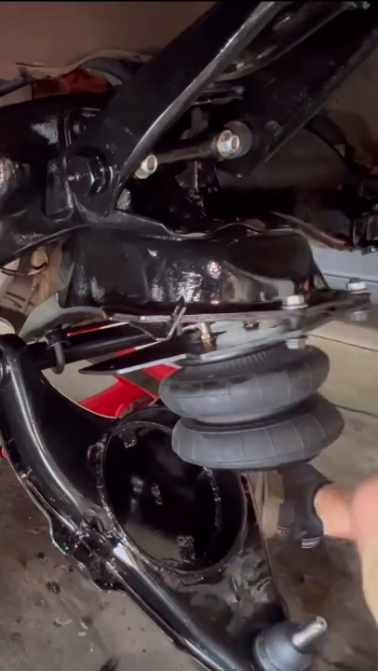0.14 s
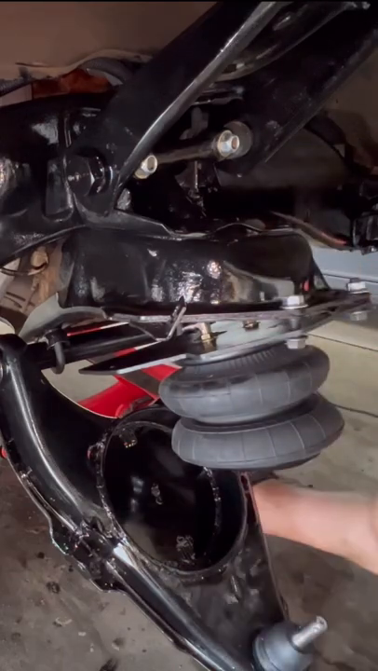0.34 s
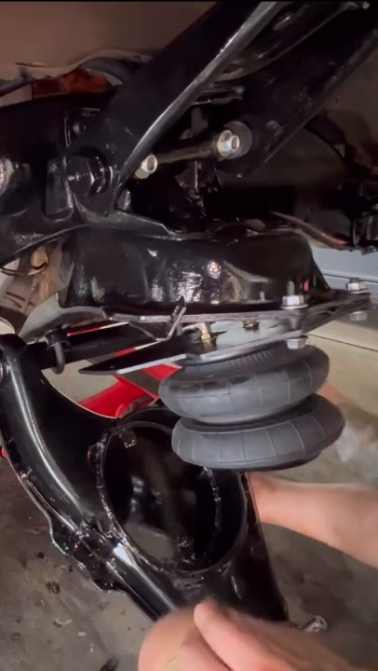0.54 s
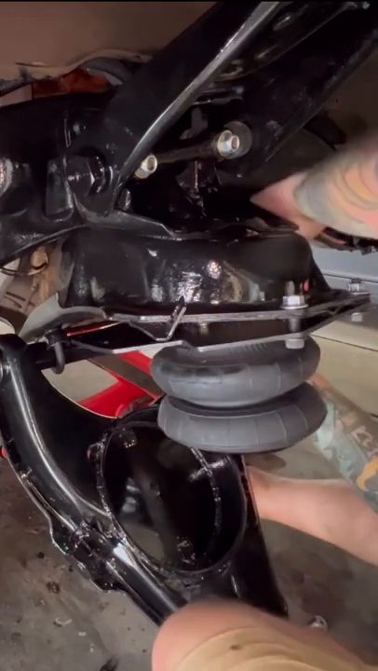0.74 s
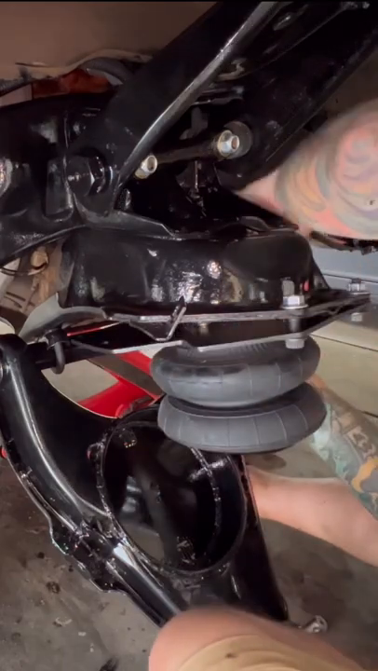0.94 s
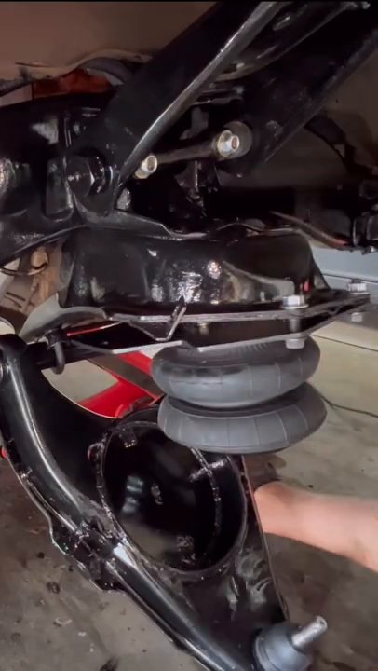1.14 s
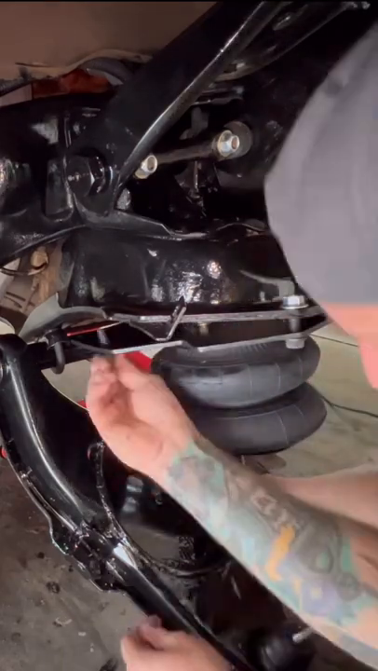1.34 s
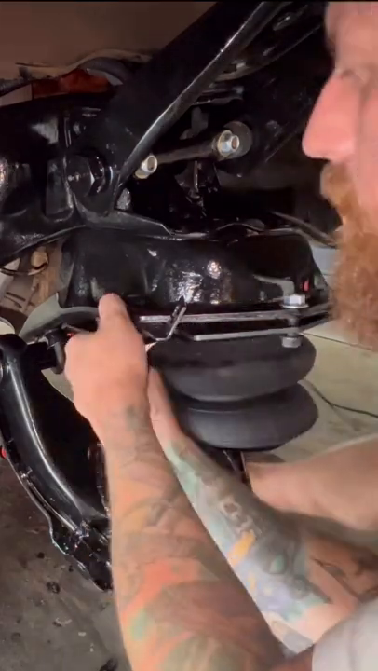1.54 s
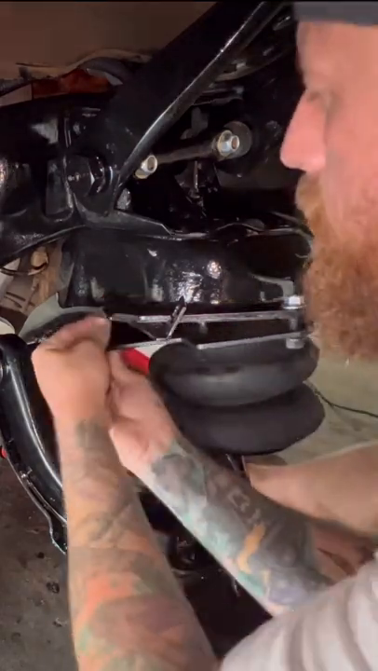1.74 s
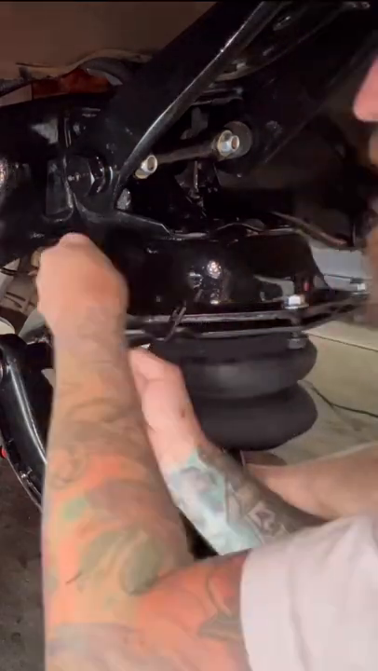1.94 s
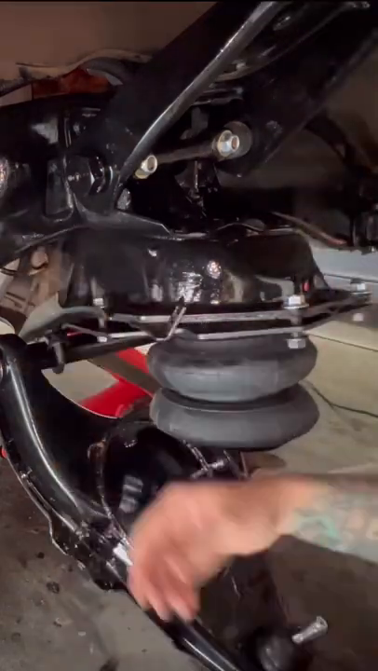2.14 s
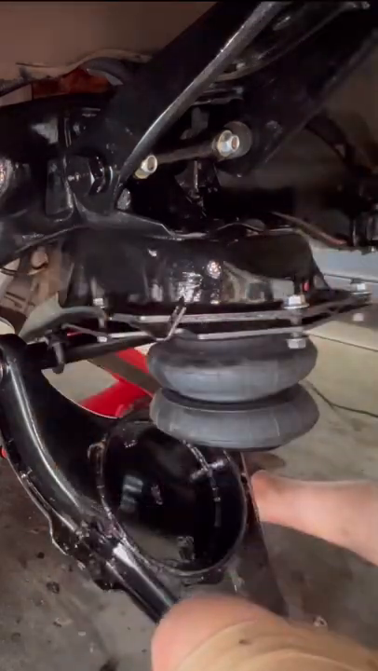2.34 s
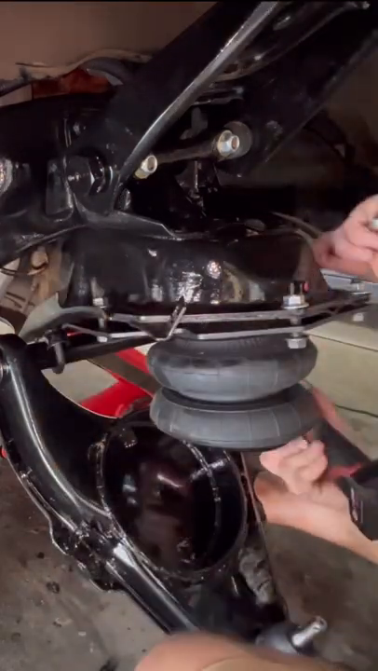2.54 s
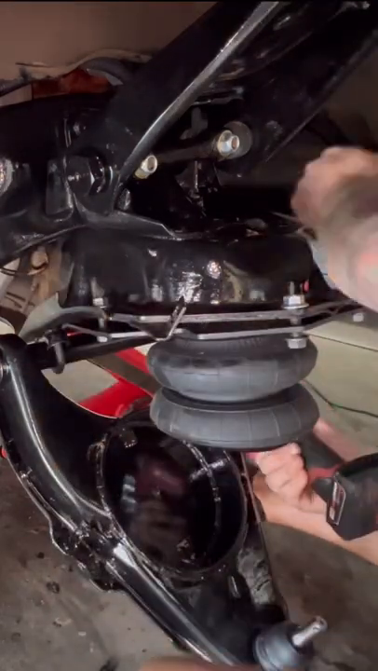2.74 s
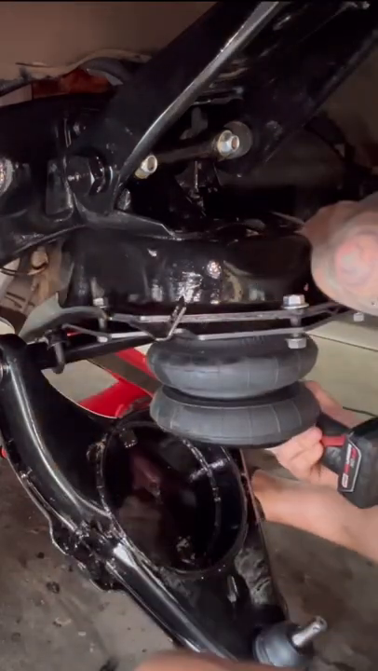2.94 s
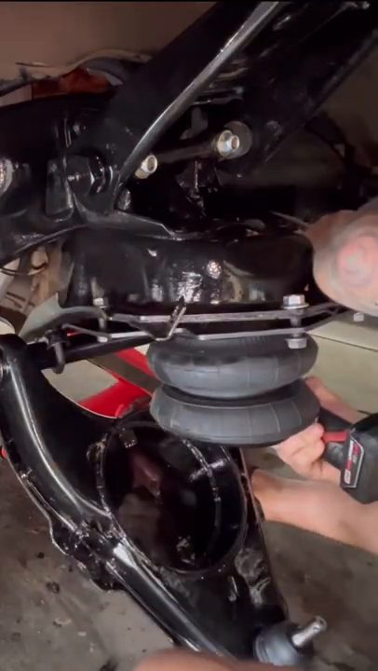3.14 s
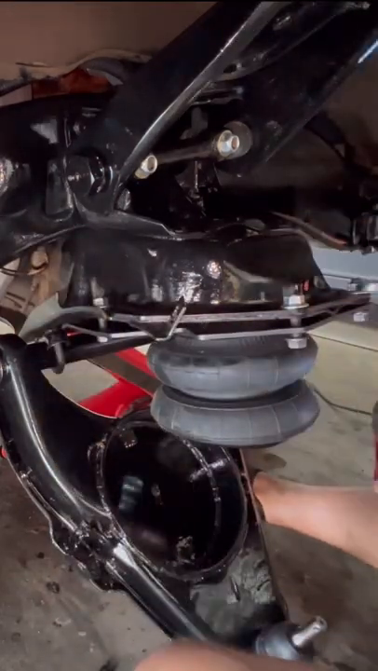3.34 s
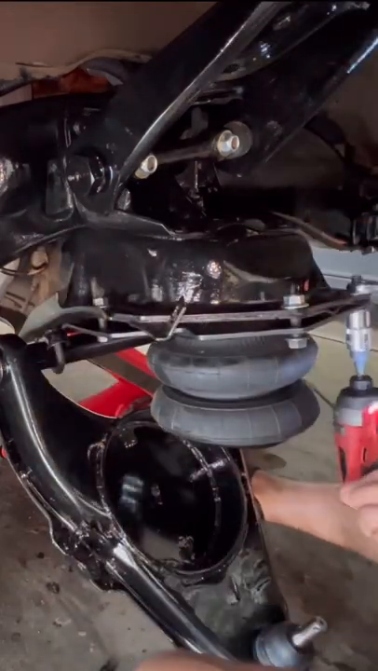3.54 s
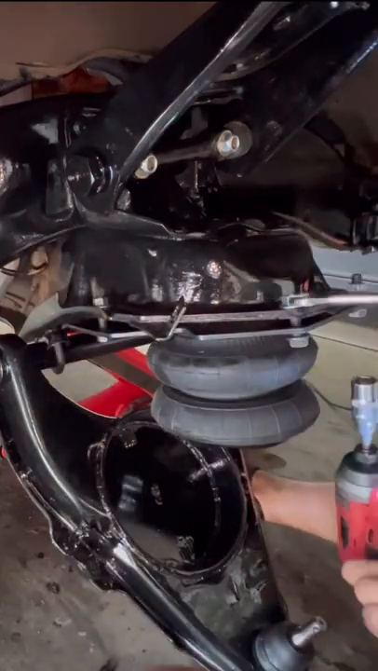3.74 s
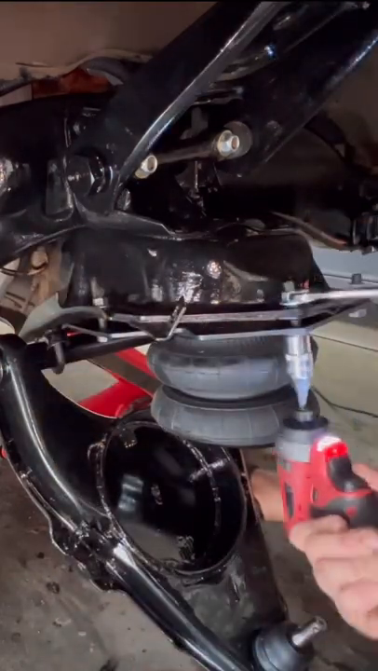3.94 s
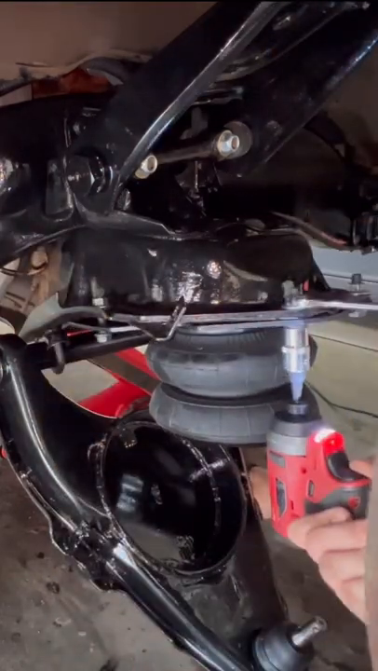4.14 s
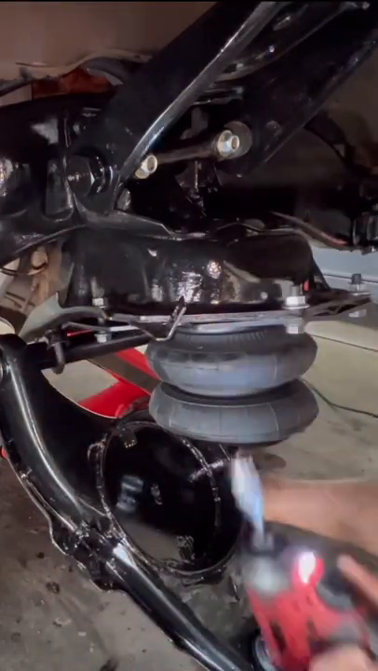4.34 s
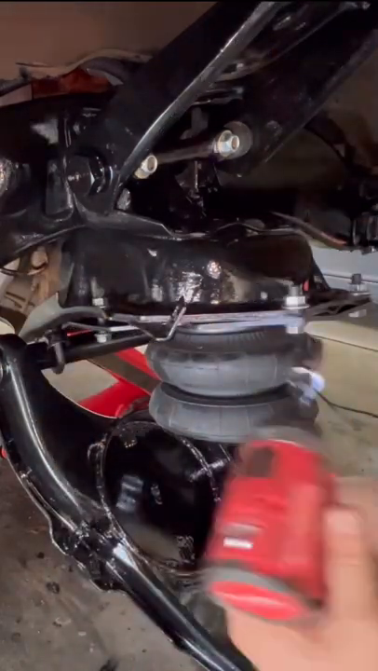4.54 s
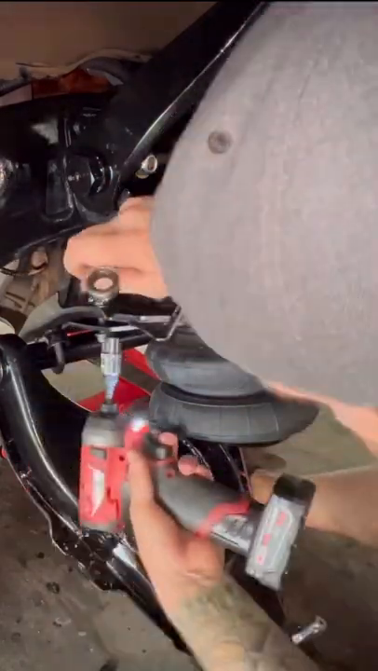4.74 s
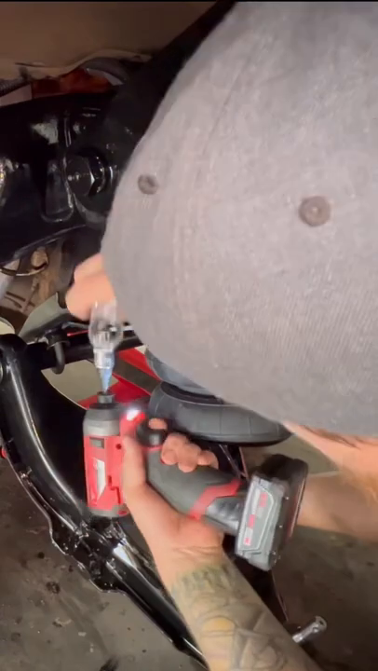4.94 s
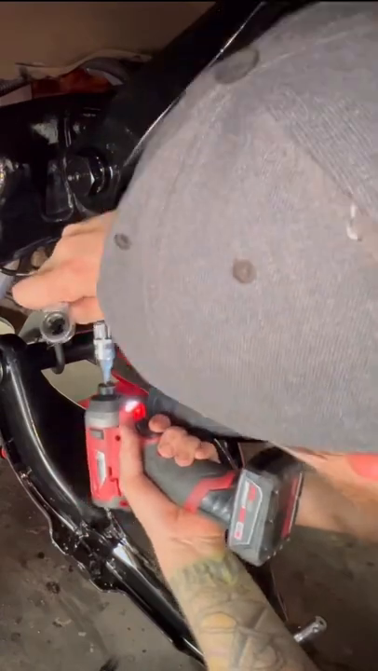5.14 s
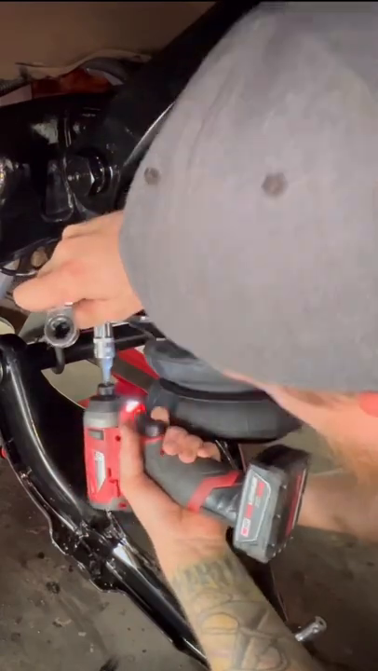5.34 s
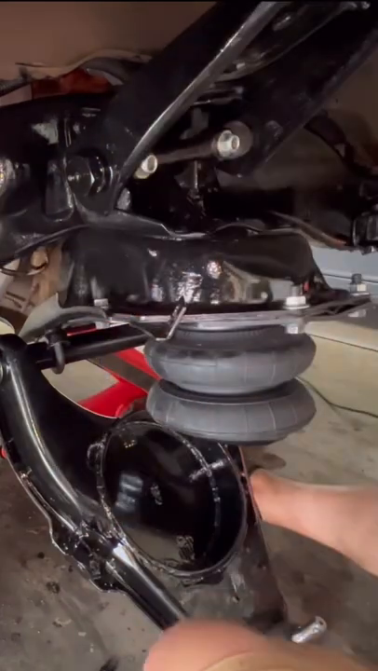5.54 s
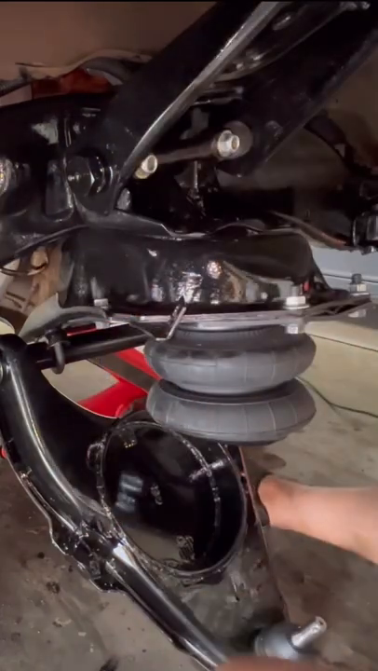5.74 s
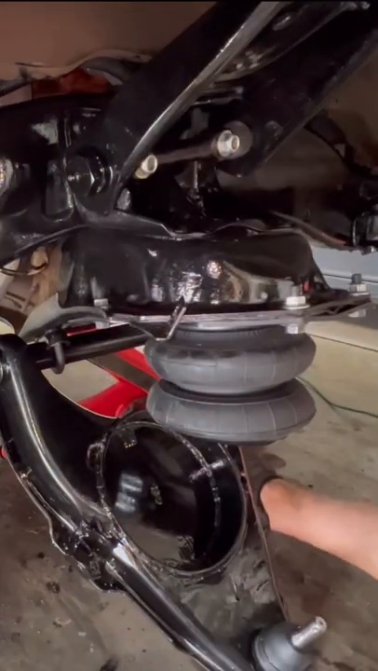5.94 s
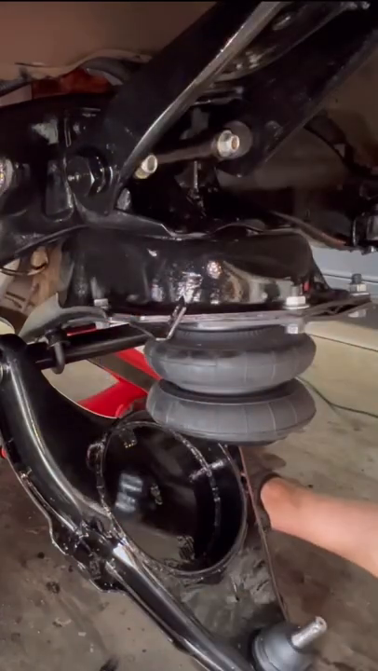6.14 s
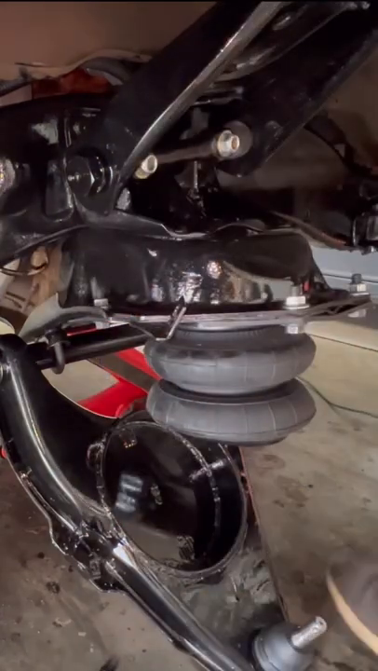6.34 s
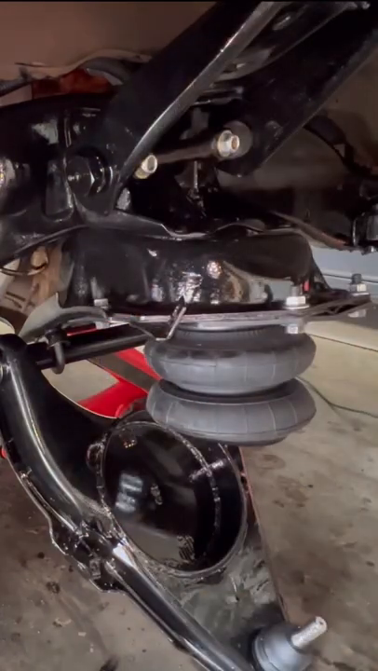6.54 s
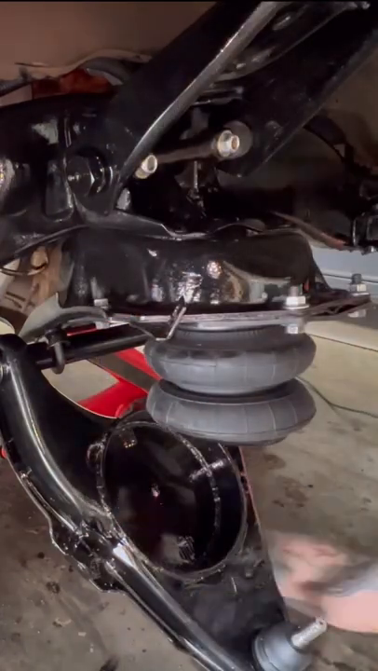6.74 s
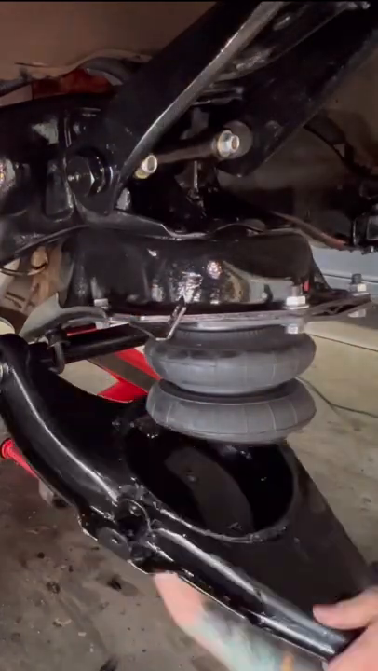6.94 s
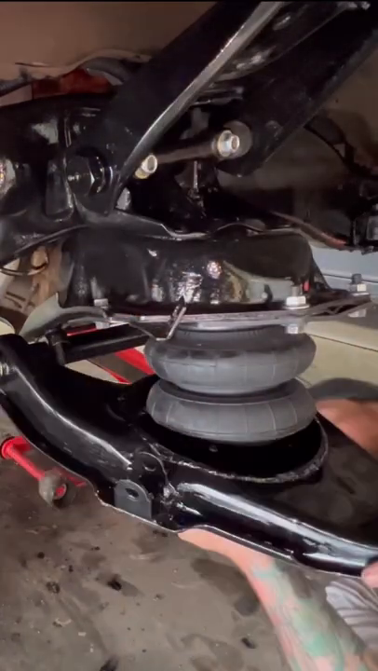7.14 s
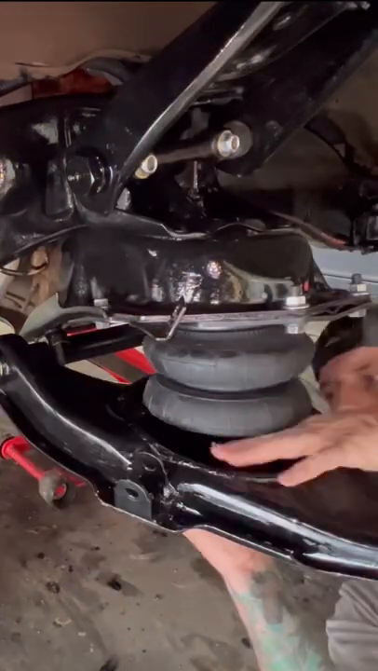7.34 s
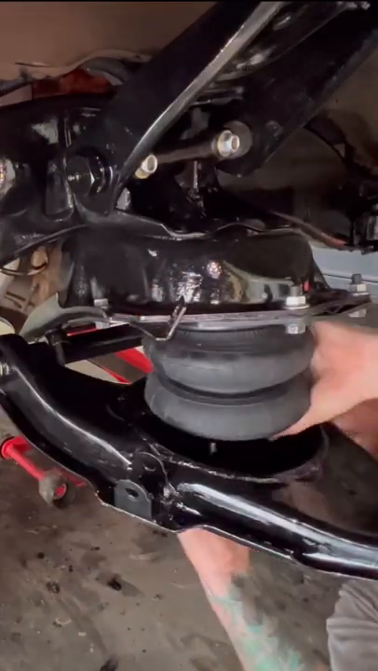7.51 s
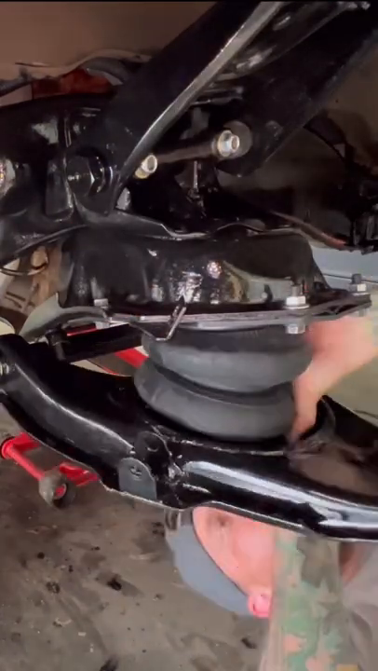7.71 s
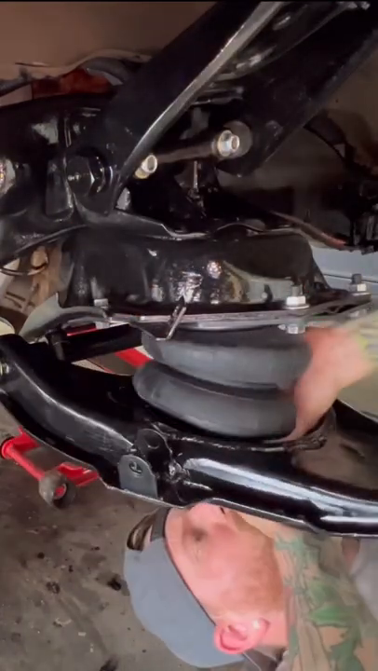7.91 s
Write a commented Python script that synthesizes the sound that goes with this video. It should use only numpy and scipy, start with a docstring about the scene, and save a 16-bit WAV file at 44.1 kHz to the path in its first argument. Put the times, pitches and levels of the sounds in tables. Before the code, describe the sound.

Fast, high-pitched metal ticks and clanks in a workshop, cut by short whining bursts of a cordless impact wrench, ending in a joint's gritty clicks and bright knocks.

```python
"""Impact wrench in a workshop

A cordless impact wrench fires short bursts at bolts on a car's suspension: noise gated by each blow, plus whining sines.
Dull overload pops chirp during the bursts. Between them steel parts clank and tick (noise puffs into ringing modes),
hands shuffle, and a lifted joint slips. Hum, shop noise and a faint far whistle lie behind; hum, noise and shuffle
sink under the bursts and creep back. All of it runs fast and high, and reaches two microphone ports with their own
level and phase differences."""
import sys
import numpy as np
from scipy import signal
from scipy.fft import rfft, irfft, next_fast_len
from scipy.io import wavfile

SR = 44100
rng = np.random.default_rng(int(sys.argv[2]) if len(sys.argv) > 2 else 0)


def generate_wav(signal):
    """Clip the signal to [-1, 1] and save it as 16-bit WAV at the path in sys.argv[1]."""
    frames = np.transpose(np.atleast_2d(signal))
    scaled = np.clip(frames, -1, 1) * 32767
    pcm = np.round(scaled).astype(np.int16)
    wavfile.write(sys.argv[1], SR, pcm)


N = 351477   # samples
FFT = next_fast_len(N + 4096)   # samples

# How far the background is down under the bursts. Each row: time in seconds, level in dB.
BACKGROUND = [(0, 0), (2.96, -4), (3.12, -16), (3.27, -24), (3.42, -21), (3.56, -13), (3.72, -32),
              (3.82, -33.5), (3.94, -18.5), (4.02, -22), (4.18, -30), (4.46, -31.5), (4.56, -27.5),
              (4.9, -13.5), (5.1, -35), (5.46, -34), (5.62, -22.5), (5.99, -17), (6.15, -5.5), (6.4, -1.5),
              (6.7, -0.5), (7.97, -1.5)]
# Parts knocked and set down. Each row: start in seconds, relative level of the high, low and middle bands in dB,
# ring of the middle band in Hz.
CLANKS = [(0.184, -35.5, -57, -47.5, 1720), (.3965, -15.5, -66, -36, 4450), (.443, -32, -60, -45.5, 4270),
          (0.495, -31, -52, -43, 1730), (0.543, -23.5, -54, -51, 4660), (0.55, -20, -49, -39, 4650),
          (0.5772, -23.5, -33, -27.5, 3440), (0.6082, -33, -33.5, -30, 3450), (.63, -11, -27.5, -22, 2000),
          (.696, -31, -48, -60, 1630), (0.734, -31, -56, -52, 2400), (.764, -27, -56, -47, 1950),
          (.8345, -33, -72, -47, 2650), (.859, -32, -61, -46.5, 2400), (.921, -35, -57, -51, 2410),
          (0.997, -34.5, -61.5, -42.5, 2390), (1.2216, -36.5, -51.5, -55, 3640),
          (1.307, -27.5, -48, -37.5, 2820), (1.3264, -28, -49, -38, 2840), (1.3508, -17, -43, -31, 2900),
          (1.3663, -23.5, -46, -42.5, 2760), (1.4326, -38, -39.5, -35.5, 1970),
          (1.4656, -9.5, -27, -16.5, 3214), (1.5723, -29, -38.5, -34.5, 1980), (1.622, -32, -47, -48, 2680),
          (1.667, -38, -39, -39, 1900), (1.6945, -34.5, -39.5, -40, 1890), (1.732, -30, -36.5, -38.5, 2660),
          (1.758, -51, -50, -44, 2780), (1.7833, -32, -42.5, -43, 2210), (1.8342, -24.5, -41, -32, 3300),
          (1.8464, -30, -32.5, -32, 2670), (1.9061, -19.5, -29.5, -28, 2780), (1.947, -22, -52, -43, 2810),
          (1.9603, -24.5, -50, -51, 2780), (2.0293, -31, -47, -55, 2420), (2.0642, -31.5, -42.5, -46, 2060),
          (2.4438, -26, -63, -40.5, 2780), (2.4683, -19, -52, -46, 3450), (2.5077, -15, -42, -32.5, 2760),
          (2.5775, -21.5, -47, -41, 3200), (2.708, -22.5, -54, -42, 3120), (2.7154, -20.5, -47, -46, 3120),
          (2.7656, -21.5, -54, -41, 2730), (2.816, -24, -54, -39, 2620), (2.8226, -17, -45, -39, 2660),
          (2.8594, -23.5, -43, -35, 2690), (2.8736, -47, -44, -43, 2774), (3.3024, -54.5, -73, -64.5, 2700),
          (3.3458, -47, -74, -64, 2760), (3.3734, -53.5, -70.5, -58, 2690), (3.45, -45.5, -68, -56.5, 2820),
          (3.494, -35, -54.5, -43, 2746), (3.856, -52.5, -75, -58.5, 1940), (3.8945, -46, -63, -59.5, 2620),
          (3.925, -44.5, -58, -52.5, 1960), (3.9474, -23, -50, -37.5, 3570),
          (4.6214, -45.5, -68, -61.5, 2650), (4.6703, -42, -69, -61, 3100), (4.71, -49.5, -72, -58, 2870),
          (4.799, -49.5, -76.5, -60, 3210), (4.8194, -42, -55, -47, 3390), (5.47, -54, -79.5, -74.5, 5670),
          (5.5702, -43, -75.5, -57.5, 3320), (6.0167, -36.5, -64, -49, 4930),
          (6.167, -39.5, -56, -45.5, 2710), (6.3624, -36, -66, -46, 4740),
          (6.5595, -32.5, -60, -44.5, 3550), (7.0264, -25, -64, -49, 5180), (7.1154, -12, -45, -36, 1810),
          (7.361, -39, -45.5, -41.5, 3450), (7.3868, -26, -54, -36, 3450), (7.4488, -45.5, -54, -35, 3570),
          (7.5196, -23, -59, -43.5, 3600), (7.5483, -16, -63, -45.5, 3520), (7.61, -28, -57, -44.5, 3460),
          (7.672, -20, -53, -62, 1610), (7.7333, -4, -50.5, -32, 3600), (7.789, -36, -54, -43, 3510),
          (7.8176, -15.5, -50, -45.5, 3600), (7.852, -18.5, -47.5, -44, 1570)]


def amp(db):
    """dB to gain."""
    return 10 ** (np.asarray(db) / 20)


def rms_one(x):
    """Scale to rms 1."""
    return x / np.sqrt(np.mean(x ** 2) + 1e-20)


def in_time(rows):
    """Columns of a curve, interpolated to every sample."""
    s, *columns = np.transpose(rows)
    return [np.interp(np.arange(N) / SR, s, c) for c in columns]


def at_hz(points):
    """A table over frequency, interpolated along log frequency onto the FFT grid."""
    hz, value = np.transpose(points)
    grid_hz = np.arange(FFT // 2 + 1) * SR / FFT
    return np.interp(np.log(grid_hz + 1), np.log(hz + 1), value)


def colour(x, spectrum):
    """Shape a signal by a spectrum in dB; rms 1."""
    shaped = rfft(x, FFT) * amp(at_hz(spectrum))
    return rms_one(irfft(shaped, FFT)[..., :N])


def band_pass(x, lo_hz, hi_hz, order=2):
    """Butterworth band-pass."""
    return signal.sosfilt(signal.butter(order, [lo_hz, hi_hz], "band", fs=SR, output="sos"), x)


def high_pass(x, hz, order):
    """Butterworth high-pass."""
    return signal.sosfilt(signal.butter(order, hz, "high", fs=SR, output="sos"), x)


def ring(x, hz, t60):
    """Two-pole resonator: a unit click sets a sine of height 1 dying by 60 dB in t60 seconds."""
    r, w = amp(-60 / (t60 * SR)), 2 * np.pi * hz / SR
    return signal.lfilter([0, np.sin(w)], [1, -2 * r * np.cos(w), r * r], x + 1e-18)


def drift(rate_hz):
    """Slow random wander, rms 1: white noise through two low-pass poles, warmed up for a second."""
    r = np.exp(-2 * np.pi * rate_hz / SR)
    slow = signal.lfilter([1], [1, -2 * r, r * r], rng.standard_normal(N + SR))
    return rms_one(slow[SR:])


def noise_pair(apart):
    """White noise for both ports: a shared part, and a part of opposite sign in the two."""
    shared, own = rng.standard_normal((2, N))
    return (shared + apart * own * [[1], [-1]]) / np.sqrt(1 + apart ** 2)


def shop():
    """Steady hum of sines, coloured shop noise and a far gliding whistle; hum and noise follow the background."""
    # The steady hum. Each row: frequency in Hz, relative level in dB.
    hum_lines = [(592.2, -15.5), (1200.5, 2), (1726, -24.5), (2400, -23.5), (3600, -23)]
    # Colour of the shop noise. Each row: frequency in Hz, relative level in dB per Hz.
    shop_spectrum = [(35, -93.5), (60, -67.5), (315, -34.5), (579, -15.5), (1110, -16.5), (1380, -21),
                     (3040, -32), (3900, -30.5), (6000, -30.5), (9000, -42), (16000, -46.5)]
    # A faint far whistle, swelling twice. Each row: time in seconds, pitch in Hz, level in dB.
    whistle_path = [(5.8, 680, -77), (6.05, 742, -66), (6.2, 780, -65.5), (6.26, 775, -90), (6.5, 615, -89),
                    (6.6, 623, -59.5), (6.906, 608.6, -44), (7.35, 658, -57.5)]
    hum_db, noise_db = -42.5, -52
    swell_s, swell_width_s, swell_db = 6.79, 0.31, 4   # the noise swells near the louder whistle

    t = np.arange(N) / SR
    hum = sum(amp(db + 0.84 * drift(24)) * np.sin(2 * np.pi * hz * t) for hz, db in hum_lines)
    swell = swell_db * np.exp(-((t - swell_s) / swell_width_s) ** 2)
    noise = amp(drift(11) + swell) * colour(noise_pair(apart=0.088), shop_spectrum)
    fade_in, fade_out = (5.7, whistle_path[0][1], -90), (7.45, whistle_path[-1][1], -90)
    hz, db = in_time([fade_in, *whistle_path, fade_out])
    whistle = amp(db) * np.sin(2 * np.pi * np.cumsum(hz) / SR)
    sunk = amp(in_time(BACKGROUND)[0])
    return sunk * (amp(hum_db) * hum + amp(noise_db) * noise) + whistle


def shuffle():
    """Clumped, uneven ticks of grit over a soft rub; loose parts rattle on in the same grit after each knock."""
    # Hands and sleeves over the parts. Each row: time in seconds, relative level of the high and middle bands in dB.
    shuffle_path = [(0, -69, -64.5), (1.25, -63.5, -65), (1.65, -54.5, -56), (2.2, -62.5, -58),
                    (2.86, -63, -59), (6.1, -62, -62.5), (6.55, -51, -55), (7.28, -58, -56.5),
                    (7.39, -49, -45), (7.5, -61, -68), (7.95, -95, -63)]
    after_db, after_s = -38, 0.063   # after-rattle: relative level, decay time constant

    high_db, middle_db = in_time(shuffle_path)
    ticks_per_s = 900 * amp(5.0 * drift(20))
    tick_size = amp(4.0 * np.minimum(rng.exponential(1, N), 4))
    ticks = (rng.random(N) < ticks_per_s / SR) * tick_size
    rub_and_ticks = 1 + signal.lfilter([1], [1, -.985], ticks)
    grit = rub_and_ticks * noise_pair(apart=0.37)
    high = rms_one(band_pass(grit, 8100, 17000) + .6 * band_pass(grit, 6900, 10200, order=1))
    # the arm's tube colours the middle
    middle = rms_one(band_pass(grit, 1800, 6500) + 1.5 * band_pass(grit, 3300, 3650, order=1))

    knocks = np.zeros((2, N))
    for s, knock_db, _, knock_middle_db, _ in CLANKS:
        knocks[:, round(s * SR)] = amp([knock_db, knock_middle_db + 10])
    r = np.exp(-1 / (after_s * SR))
    after = amp(after_db) * signal.lfilter([1], [1, -r], knocks + 1e-18)
    sunk = amp(in_time(BACKGROUND)[0])
    high_level = sunk * amp(high_db + 2.0) + after[0]
    middle_level = sunk * amp(middle_db) + after[1]
    return high_level * high + middle_level * middle


def clanks():
    """A sharp crack and a dying puff of noise in three bands; each blow rings the steel's modes unevenly."""
    # Modes of the steel parts. Each row: frequency in Hz, relative level in dB, time to fall 60 dB in seconds.
    steel_modes = [(890, -11.5, 0.072), (1057, -6.5, 0.15), (1377, -3.5, 0.068), (1980, -8.5, 0.11),
                   (2740, -10.5, 0.067), (3500, -11.5, 0.16), (4200, -10, .04), (5650, -16.5, .05)]
    puff_t60_s, crack_s = 0.052, 0.0031   # the low band falls about half as fast as the puff
    arm_from_s = 6.9

    low_level, high_level = np.full((2, N), 1e-18)
    middle, blow = np.zeros((2, N)), np.zeros(N, int)
    t, grit = np.arange(SR // 10) / SR, noise_pair(apart=1.0)
    crack, fall = np.exp(-t / crack_s), amp(-60 * t / puff_t60_s)
    for k, (s, high_db, low_db, middle_db, hz) in enumerate(CLANKS):
        i = round(s * SR)
        now = slice(i, i + len(t))
        blow[i:] = k
        low_level[now] += amp(low_db + 11) * fall ** 0.51 * (1 - np.exp(-t / 0.0008))
        high_level[now] += amp(high_db - 8) * (fall + 1.3 * crack) * (1 - np.exp(-t / 0.00028))
        puff = (fall + 0.42 * crack) * (1 - np.exp(-t / 0.0003)) * grit[:, now]
        middle[:, now] += amp(middle_db + 3.5) * (1.1 * puff + 0.084 * ring(puff, hz, t60=0.022))
    middle = band_pass(middle, 2200, 6300)
    low = low_level * noise_pair(apart=0.16)
    high = high_level * noise_pair(apart=0.19)

    # each blow draws its own gain for every mode
    uneven = amp(3.2 * rng.standard_normal((len(CLANKS), len(steel_modes))))[blow].T
    strike = low + .6 * middle
    steel = sum(amp(db - 38) * ring(share * strike, hz, t60)
                for share, (hz, db, t60) in zip(uneven, steel_modes))
    # the heavy arm rings near 10 kHz with little else in the top
    airy = np.where(np.arange(N) < arm_from_s * SR, 1, .25)
    bright = airy * band_pass(high, 8900, 18000) + 1.3 * band_pass(high, 9900, 10030, order=1)
    return high_pass(band_pass(low, 540, 2500) + middle + bright + steel, 350, order=3)


def thumps():
    """A bump reaches the ports as a short push or ping: one quickly damped sine."""
    # Bumps. Each row: start in seconds, level in dB, tone in Hz, decay time constant in seconds.
    bumps = [(2.714, -65, 110, .0041), (2.918, -47.5, 110, 0.0037), (7.1163, -26, 1770, 0.0029),
             (7.733, -41, 110, 0.0018)]
    out, t = np.zeros(N), np.arange(SR // 10) / SR
    for s, db, hz, decay in bumps:
        envelope = (1 - np.exp(-t / 0.00067)) * np.exp(-t / decay)
        out[round(s * SR):][:len(t)] += amp(db) * envelope * np.sin(2 * np.pi * hz * t)
    return out


def trigger():
    """Blow rate and five levels: a burst spins up, bites, settles, and stops with a short tail."""
    # Trigger pulls. Each row: start, stop and attack in seconds, first and full blows per second,
    # bright rattle in relative dB and its climb in dB per second, socket chatter and body rattle in relative dB,
    # settling time constant in seconds, free and loaded whine in relative dB.
    bursts = np.array([(2.903, 3.172, 0.0056, 548, 666, -28, -11, -31, -39, 0.047, -39.5, -52),
                       (3.529, 3.653, 0.015, 648, 710, -27.5, 26, -27, -24.5, .18, -50, -48.5),
                       (3.982, 3.995, 0.011, 630, 630, -30, 2.5, -29, -29, 0.049, -42.5, -51.5),
                       (4.026, 4.31, .013, 646, 655, -30, 11, -28, -26.5, 0.1, -53.5, -47),
                       (4.889, 4.926, .022, 632, 638, -24, 1.5, -19, -37.5, 0.062, -44, -40),
                       (4.972, 5.346, .016, 645, 655, -31, 3.5, -28, -29, 0.14, -56, -47)])
    # Times in seconds when the nut seats; the motor labours until the trigger is let go.
    seats_s = [4.225, 5.21]
    spin_up_s, attack_from_db = .062, -22.5
    # changes over the settling time, in dB
    bite_db, chatter_settles_db, body_settles_db, load_builds_db = 7.5, 16.5, 16.5, 9.5
    stop_db_per_s, tail_db, tail_db_per_s = 1498.5, -15, 649
    low_tail_db, low_tail_db_per_s = -8, 549.5   # chatter and body rattle linger in the room
    seat_sag_per_s, seat_sag_s, seat_whine_db = 22, .03, 4.5   # blows per s lost, time constant, whine gain

    t = np.arange(N) / SR
    row = bursts[np.maximum(np.searchsorted(bursts[:, 0], t) - 1, 0)].T   # the latest pull at each sample
    start, stop, attack, from_rate, rate, bright, climb, chatter, body, settling, free, loaded = row
    age, after = np.clip(t - start, 0, stop - start), np.maximum(t - stop, 0)
    fresh = np.exp(-np.maximum(age - attack, 0) / settling)
    edge = attack_from_db * np.clip(1 - age / attack, 0, 1) - 200 * (t < start)
    short, lingering = [tail_db, tail_db_per_s], [low_tail_db, low_tail_db_per_s]
    tail = np.array([short, lingering, lingering, short, short])
    dying = np.minimum(tail[:, :1] - tail[:, 1:] * after, 0)
    edge = edge + np.maximum(-stop_db_per_s * after, dying)
    seated = sum((start < s) * (stop > s) * (1 - np.exp(-np.maximum(t - s, 0) / seat_sag_s)) for s in seats_s)
    levels = [bright + bite_db * fresh + climb * age,
              chatter - chatter_settles_db * (1 - fresh),
              body - body_settles_db * (1 - fresh),
              free,
              loaded - load_builds_db * fresh + seat_whine_db * seated]
    per_s = rate + (from_rate - rate) * np.exp(-age / spin_up_s) - seat_sag_per_s * seated
    return per_s, *(edge + np.array(levels))


def whine(turns, orders):
    """Sines at multiples of the blow rate, swelling and fading by five shared drifts."""
    waver = [drift(25) for _ in range(5)]
    out = 0
    for k, (multiple, db) in enumerate(orders):
        tone = np.sin(2 * np.pi * (multiple * turns + rng.random()))
        out = out + amp(db + 5.0 * waver[k % 5]) * tone
    return out


def wrench():
    """Each hammer blow gates a rattle that rings the socket; the even part of the blows sounds as a whine."""
    # Colours of bright rattle, socket chatter and body rattle. Each row: frequency in Hz, relative dB per Hz.
    bright_spectrum = [(3500, -43.5), (4500, -10), (5800, -7), (7000, -18.5), (8300, -4), (9300, 2.5),
                       (12000, 0), (15500, 0)]
    chatter_spectrum = [(1500, -41), (2200, -9), (2700, -1.5), (2900, -4), (3150, 0.5), (3600, -3.5),
                        (4500, -9.5), (7000, -41)]
    body_spectrum = [(60, -44), (150, -40.5), (300, -27.5), (530, -6.5), (1000, -3), (1900, -4.5),
                     (3000, -15), (6000, -37.5)]
    # Modes of the socket. Each row: frequency in Hz, relative level in dB, time to fall 60 dB in seconds.
    socket_modes = [(1955, 2, 0.33), (3180, -5, 0.14), (5800, -3.5, 0.15), (6374, -14.5, .18),
                    (9600, -4, 0.13)]
    # Whine with the nut running free, then tight. Each row: multiple of the blow rate, relative level in dB.
    free_orders = [(1, -11.5), (2, -3), (3, -9), (4, 1), (5, -0.5), (6, -13.5), (7, -4), (8, -3), (9, -7.5),
                   (10, -2.5), (13, -12), (14, -6), (17, -5), (18, -4), (19, -0.5), (20, -8), (23, -2.5)]
    loaded_orders = [(5, -5), (8, 0.5), (9, 4), (11, 6), (14, 3), (16, -1.5), (19, -0.5), (22, 10.5),
                     (24, 3)]

    per_s, bright_db, chatter_db, body_db, free_db, loaded_db = trigger()
    turns = np.cumsum(per_s * (1 + .0015 * drift(60) + .003 * drift(9))) / SR   # blows so far
    gate = .5 + np.exp(-3.0 * (turns % 1))
    strength = amp(rng.standard_normal(int(turns[-1]) + 1))[turns.astype(int)]   # one draw per blow
    bright = colour(gate * strength * noise_pair(apart=0.74), bright_spectrum)
    bright = amp(bright_db + 2.0 + 1.4 * drift(40)) * bright
    chatter = colour(strength * noise_pair(apart=0.87), chatter_spectrum)
    chatter = amp(chatter_db - 0.5 + 2.0 * drift(70)) * chatter
    body = amp(body_db - 2.5 + 2.0 * drift(55)) * colour(noise_pair(apart=.2), body_spectrum)
    tones = amp(free_db + 3.5) * whine(turns, free_orders) + amp(loaded_db + 4.5) * whine(turns, loaded_orders)
    rattle = bright + chatter + body
    socket = sum(amp(db - 56.5) * ring(rattle, hz, t60) for hz, db, t60 in socket_modes)
    return rattle + tones + socket


def pops():
    """A steep high-pass smears each overload pop into a short falling chirp; a little rumble leaks through."""
    # Runs of dull overload pops during the bursts. Each row: start, length and gap in seconds,
    # relative level of the first pop in dB, loss in dB per second.
    runs = [(3.54, .108, 0.0089, -14, 89.5), (3.993, .002, 0.0038, -8.5, 1),
            (4.036, .055, 0.0073, -17.5, 153), (4.124, .03, .011, -24, 254), (4.993, .058, .0043, -14, 101),
            (5.078, .017, 0.0036, -23, 102.5)]
    gap_jitter, spread_db = .2, 4   # share of a gap; most a pop's level strays

    clicks = np.full(N, 1e-18)
    for s, length, gap, db, loss in runs:
        shift, size, sign = rng.standard_normal((20, 3)).T
        for k, age in enumerate(np.arange(0, length, gap)):
            late = (k > 0) * gap_jitter * gap * shift[k]   # the first pop is on time
            level_db = db + 26.5 - loss * age + spread_db * np.tanh(size[k])
            clicks[round((s + age + late) * SR)] = amp(level_db) * np.sign(sign[k])
    chirp = high_pass(clicks, 450, order=6)
    dull = signal.butter(3, 1250, fs=SR, output="sos")
    return signal.sosfilt(dull, chirp + amp(-22) * clicks)


def slips():
    """Each slip is a snap of grit in a broad high resonance, with a weaker overtone and a short after-rattle."""
    # The suspension arm's joint slips as it is lifted. Each row: start in seconds, relative peak in dB.
    joint_slips = [(6.9369, -11), (6.948, -14.5), (7.0804, -20.5), (7.086, -20), (7.1046, -14),
                   (7.1343, -24), (7.1487, -14), (7.1652, -16.5), (7.1828, -24.5), (7.204, -20),
                   (7.2197, -7.5), (7.23, -9), (7.2547, -34.5)]
    centre_hz, spread_hz = 9200, 140

    out, t = np.zeros(N), np.arange(SR // 25) / SR
    for s, db in joint_slips:
        hz = centre_hz + spread_hz * rng.standard_normal()
        snap_and_rattle = np.exp(-t / 0.00057) + 0.22 * np.exp(-t / 0.0061)
        grit = snap_and_rattle * rng.standard_normal(len(t))
        overtone = .4 * ring(grit, 1.28 * hz, t60=.003)
        tick = ring(grit, hz, t60=.0035) + overtone + .05 * np.diff(grit, prepend=0)
        out[round(s * SR):][:len(t)] += amp(db + 1) * tick / np.abs(tick).max()
    return amp(1.5) * band_pass(out, 7460, 11500)


def ports(x, left_db, lead):
    """Level and phase step between the two microphone ports, half given to each."""
    step = amp(at_hz(left_db) / 2) * np.exp(.5j * at_hz(lead))
    return irfft(rfft(x, FFT) * np.array([step, 1 / step]), FFT)[:, :N]


def scene():
    """Near work and the far shop, each with its own differences between the two ports."""
    # Level step for work near the ports, then for the shop. Each row: frequency in Hz, left minus right in dB.
    near_left_db = [(250, 1.5), (1000, 1.5), (2500, 4), (5500, 5), (11000, 4)]
    far_left_db = [(60, -0.5), (240, -1), (950, 2.0), (3770, 2.0), (15000, -1.5)]
    # Phase step for near work, then for the shop. Each row: frequency in Hz, lead of the left in radians.
    near_lead = [(10, 0), (3270, .6), (4600, 2.2), (6200, 2.2), (7200, 3.1), (8900, 5.2), (16500, 5.2)]
    far_lead = [(10, 0), (3400, -.2), (3900, -1.9), (8100, -2.2), (8900, -5.2), (16500, -5.2)]
    pop_left_db = 13   # left minus right, ahead of the near step

    background = ports(shop(), far_left_db, far_lead)
    parts = shuffle() + clanks() + thumps()
    tool = wrench() + pops() * amp([[pop_left_db / 2], [-pop_left_db / 2]])
    return background + ports(parts + tool + slips(), near_left_db, near_lead)


def record(dry):
    """The top is cut in two steps: at least 30 dB from the first edge up, 60 dB more from the second."""
    edge_hz = 15950
    first_cut = signal.sosfilt(signal.cheby2(16, 30, edge_hz, fs=SR, output="sos"), dry)
    return signal.sosfilt(signal.cheby2(16, 60, edge_hz + 1000, fs=SR, output="sos"), first_cut)


dry = scene()
out = record(dry)
generate_wav(out)
```